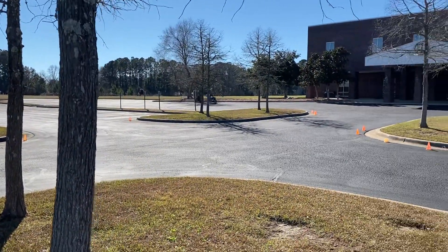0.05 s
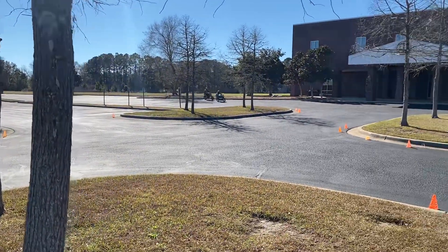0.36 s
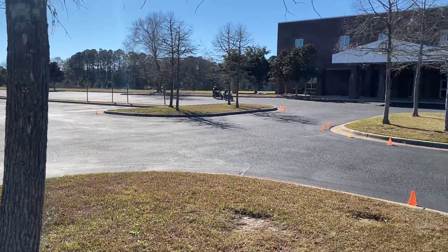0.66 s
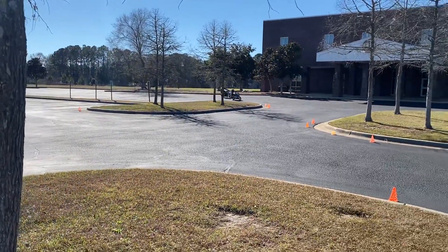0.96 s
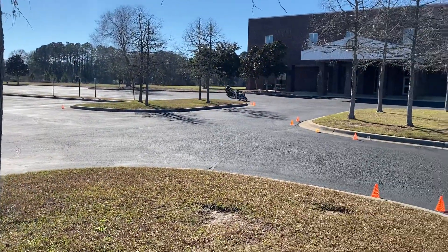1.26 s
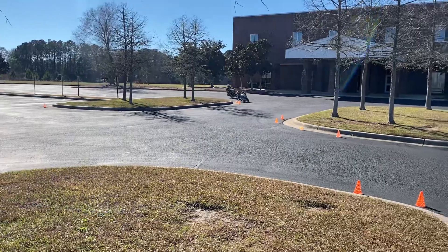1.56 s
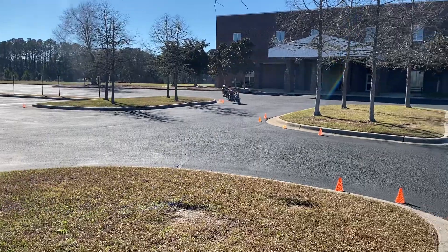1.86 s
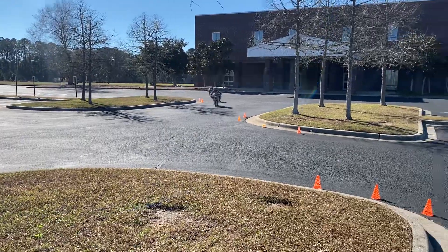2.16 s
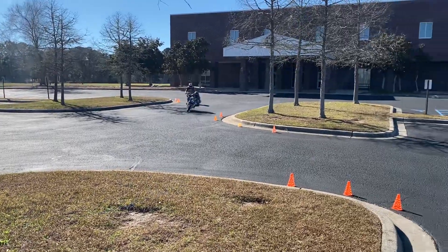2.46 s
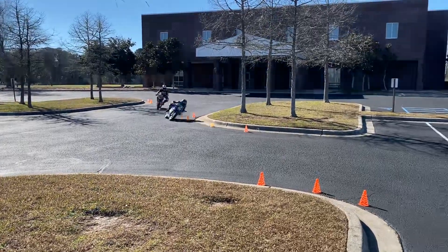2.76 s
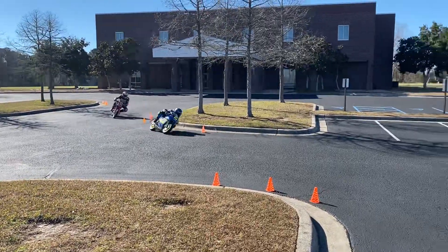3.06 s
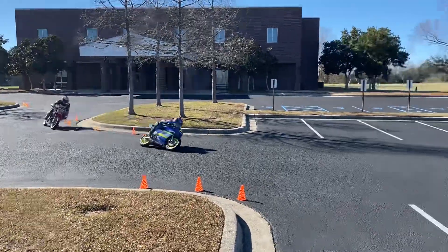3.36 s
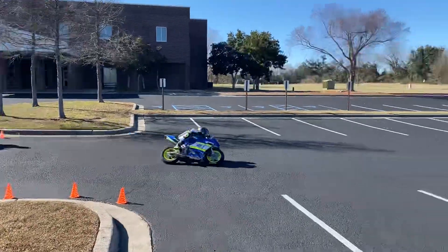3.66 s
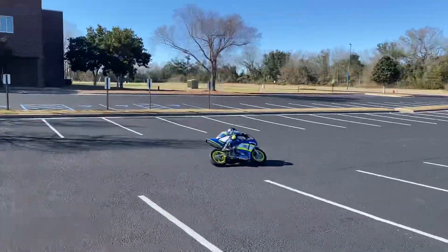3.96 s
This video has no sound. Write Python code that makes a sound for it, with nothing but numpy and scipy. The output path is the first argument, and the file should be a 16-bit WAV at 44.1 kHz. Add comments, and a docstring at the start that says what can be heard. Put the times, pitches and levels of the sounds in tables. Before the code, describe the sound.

Small motorcycle engines coast far off, then accelerate closer and pass, over light wind rumble.

```python
"""Two small single-cylinder racing motorcycles lap a paved lot in front of a building.
Far off they coast into a bend, then open their throttles and come up; the leader shifts up as it passes.
Each firing thumps the exhaust, barks under load and rings the leader's casing and silencer.
Engine clatter, tyre hiss, the building's echo and light wind on the microphone lie around them."""
import sys
import numpy as np
from scipy import signal
from scipy.fft import rfft, irfft
from scipy.io import wavfile

SR = 44100
rng = np.random.default_rng(int(sys.argv[2]) if len(sys.argv) > 2 else 0)


def bounce(signal):
    """Save signal as a 16-bit WAV file at the path given by the first command-line argument."""
    frames = np.transpose(np.atleast_2d(signal))
    limited = np.clip(frames, -1, 1)
    pcm = np.round(limited * 32767).astype(np.int16)
    wavfile.write(sys.argv[1], SR, pcm)


N = 176400
T = np.arange(N) / SR


# leader's firing rate: t/s, f/Hz
LEAD_RATE_HZ = [(0,88.6),(.19,82),(.54,76.2),(.76,64.7),(.86,61),(1.05,58.1),(1.15,59.2),(1.27,68),(1.45,78.5),(1.53,79.7),(1.83,76),
                (1.93,78.5),(1.99,82.8),(2.07,80.9),(2.26,84.6),(2.39,86.2),(2.47,85.9),(2.62,87.6),(2.9,94.7),(3.12,100.1),(3.31,102.3),
                (3.58,106.4),(3.64,105.5),(3.69,100),(3.745,97.5),(3.78,83.4),(3.85,82.9),(4,83.3)]
# leader's exhaust, far off on a light throttle: t/s, level/dB
LEAD_COAST_DB = [(0,-21),(.5,-19.5),(.7,-20.5),(.82,-27.5),(.87,-17.5),(1.05,-21),(1.2,-21.5),(1.26,-20.5),(1.36,-18.5),(1.5,-18),(1.72,-16),(1.86,-17.5),(1.93,-39),(3.6,-47),(3.7,-18),(3.76,-15),(3.82,-24)]
# leader's exhaust, driven hard or near: t/s, level/dB
LEAD_DRIVE_DB = [(0,-56),(1.2,-38.5),(1.82,-49),(1.9,-16.5),(2.3,-13.5),(2.65,-11.5),(2.95,-13.5),(3.3,-13.5),(3.63,-13.5),(3.68,-22.5),(3.76,-19.5),(3.8,-16),(4,-12.5)]
# leader's bearing: t/s, right-channel lag/ms
BEARING_MS = [(0,0.049),(2.6,0),(3.2,0.069),(3.8,0.3),(4,0.33)]
THROTTLE_S, LEAD_UNEVEN_DB = 1.872, .8

def leader():
    """First bike, swinging to the left. Returns its engine and its tyre hiss."""
    turns = crank(LEAD_RATE_HZ, drift=.0008, jitter_cycles=.002)
    turns -= np.interp(THROTTLE_S, T, turns)  # a firing lands as the throttle opens
    coast = exhaust(turns, LEAD_RATE_HZ, column=1, uneven_db=1.3)
    drive = exhaust(turns, LEAD_RATE_HZ, column=2, uneven_db=LEAD_UNEVEN_DB, boom_db=BOOM_DB)
    thump = coast * amp(curve(LEAD_COAST_DB)) + drive * amp(curve(LEAD_DRIVE_DB))
    left, right = thump + leader_bark(turns) + metal(turns)
    right = np.interp(T - curve(BEARING_MS) / 1000, T, right)
    clatter, hiss = clatter_and_tyres(turns)
    return np.array([left, right]) + clatter, hiss


# follower's firing rate: t/s, f/Hz
FOLLOW_RATE_HZ = [(0,70.96),(.3,66.14),(0.602,64.12),(1,58.95),(1.5,62.67),(1.801,59.1),(2,62.4),(2.25,59.42),(2.402,61.47),(2.551,65.68),(2.8,69.58),(2.999,74.72),(3.3,75.81),(3.6,77.45),(4,77.6)]
# follower's exhaust, far off: t/s, level/dB
FOLLOW_COAST_DB = [(0,-32.5),(.7,-24),(.9,-21.5),(1.3,-21.5),(1.55,-24),(1.9,-26),(2.3,-31.5),(2.8,-29.5),(4,-61)]
# follower under load: t/s, exhaust/dB, bark/dB
FOLLOW_LOAD_DB = [(0,-38.5,-71),(1.2,-57,-52),(1.7,-36.5,-36),(1.95,-30,-36),(2.2,-21,-28),(2.5,-20.5,-22),(2.9,-21,-28.5),(3.35,-20.5,-28),(3.7,-15.5,-27),(4,-14,-28)]

def follower():
    """Second bike, mostly at lower revs and running less evenly."""
    turns = crank(FOLLOW_RATE_HZ, drift=.0016, jitter_cycles=.004)
    coast = exhaust(turns, FOLLOW_RATE_HZ, column=3, uneven_db=1.8)
    drive = exhaust(turns, FOLLOW_RATE_HZ, column=4, uneven_db=1.8, boom_db=BOOM_DB)
    thump = coast * amp(curve(FOLLOW_COAST_DB)) + drive * amp(curve(FOLLOW_LOAD_DB))
    return thump + follower_bark(turns) * amp(curve(FOLLOW_LOAD_DB, column=2))


def crank(rate_table, drift, jitter_cycles):
    """Running count of firings; the speed drifts and each firing is slightly early or late."""
    rate_hz = curve(rate_table) * (1 + drift * wander(12))
    return np.cumsum(rate_hz) / SR + jitter_cycles * wander(40)


def firings(turns, uneven_db=1.5):
    """One click per firing, of uneven strength."""
    at = np.flatnonzero(np.diff(np.floor(turns)) > 0)
    clicks = np.zeros(N)
    clicks[at] = amp(uneven_db * rng.standard_normal(N)[at])
    return unit(clicks)


def puffs(turns, steady):
    """Gas noise that bursts at each firing and decays, over a steady share."""
    return unit((steady + np.exp(-(turns % 1))) * noise())


# exhaust harmonics: order, leader coast/dB, leader drive/dB, follower coast/dB, follower drive/dB
ORDERS_DB = [(1,-17,-0.5,-28.5,7.5),(2,-3.5,0.5,4,-6),(3,2.5,-5,-10,0),(4,-3.5,-8.5,-4.5,2),(5,-11.5,-6.5,-12.5,4.5),(6,-10.5,-6,-14.5,2.5),(7,-21,-15,-14.5,-4),(8,-25.5,-28,-27.5,-2)]
BOOM_HZ, BOOM_WIDTH_HZ, BOOM_DB = 170, 20, 4
PIPE_LAG_CYCLES, PIPE_SMEAR_RAD = .05, .22
PIPE_FADE_DB, PIPE_PHASE_RAD = 1.3, .25

def exhaust(turns, rate_table, column, uneven_db, boom_db=0):
    """Rounded pipe pulse: low harmonics swell and fade at random, louder crossing the pipe's boom."""
    t, rate_hz = T[::200], curve(rate_table)[::200]
    tone = np.zeros(N)
    for order, row in enumerate(ORDERS_DB, 1):
        swell, shift = sway(t, max_hz=4)
        phase = 2 * np.pi * order * (turns - PIPE_LAG_CYCLES) - PIPE_SMEAR_RAD * order ** 2
        phase += PIPE_PHASE_RAD * np.interp(T, t, shift)
        boost_db = boom_db * np.exp(-((order * rate_hz - BOOM_HZ) / BOOM_WIDTH_HZ) ** 2)
        gain = amp(row[column] + boost_db + PIPE_FADE_DB * swell)
        tone -= np.interp(T, t, gain) * np.sin(phase)
    return unit(tone) * amp(uneven_db * wander(33))


# leader's bark: t/s, level/dB, treble shelf edge/Hz
LEAD_BARK_DB_HZ = [(0,-50,1500),(.6,-50,1500),(.85,-56,1100),(1.2,-55,1100),(1.55,-41,1500),(1.862,-42,1500),(1.868,-25.5,2100),(2,-24.5,1900),(2.1,-26,1600),(2.27,-22,1750),(2.55,-22.5,1500),(2.75,-26.5,1350),(2.95,-24,1500),(3.08,-18.5,1650),(3.15,-17,1700),(3.18,-21.5,1350),(3.4,-26,1150),(3.6,-26,1300),(3.7,-33,1100),(4,-33,1100)]
# spectrum of its overtones: f/Hz, level/dB
OVERTONES_DB = [(550,-5),(700,-3),(800,-1.5),(950,-4),(1100,-.5),(1290,4),(1500,1.5),(1750,-1),(2000,-2),(2350,-5),(2800,-12),(4000,-20)]
BARK_SHELF_DB, BARK_FADE_DB, BARK_PHASE_RAD = 12, 3, .7

def leader_bark(turns):
    """Upper overtones line up into one pop per firing, with a gas puff; open throttle brightens them."""
    t, orders = T[::100], np.arange(8, 40)[:, None]
    hz = orders * curve(LEAD_RATE_HZ)[::100]
    edge_hz = curve(LEAD_BARK_DB_HZ, column=2)[::100]
    fades, shifts = sway(t, max_hz=2.2, shape=(len(orders),))
    cut_db = BARK_SHELF_DB / (1 + (edge_hz / hz) ** 10)
    gains = amp(spectrum(OVERTONES_DB, hz) + BARK_FADE_DB * fades - cut_db)
    gains /= np.linalg.norm(gains, axis=0)
    pops = np.zeros(N)
    for order, gain, shift in zip(orders, gains, shifts):
        phase = 2 * np.pi * order * turns + BARK_PHASE_RAD * np.interp(T, t, shift)
        pops += np.interp(T, t, gain) * np.cos(phase)
    pops = unit(pops) * amp(LEAD_UNEVEN_DB * wander(28))
    gas = colour(puffs(turns, steady=.1), BARK_SPECTRUM_DB)
    return (pops + .22 * gas) * amp(curve(LEAD_BARK_DB_HZ))


# follower's bark and both bikes' gas puffs: f/Hz, level/dB
BARK_SPECTRUM_DB = [(100,-59),(400,1.5),(600,5.5),(800,-1),(1000,5.5),(1250,2.5),(1520,2.5),(1750,-12),(2050,-3),(3000,-30.5),(5000,-31),(12000,-97)]

def follower_bark(turns):
    """The sharp front of each exhaust pulse with its puff of gas."""
    return colour(firings(turns) + .55 * puffs(turns, steady=.31), BARK_SPECTRUM_DB)


# engine casing and airbox modes: f/Hz, width/Hz, level/dB
CASING_MODES = [(390,130,2),(960,70,-2),(1245,50,-2),(2000,80,-6),(2350,170,1),(3000,120,-10),(3600,160,-5)]
# casing, heard only up close: t/s, level/dB
CASING_DB = [(0,-70),(3,-52),(3.5,-39),(3.7,-28),(3.85,-25.5),(4,-23)]
# silencer modes: f/Hz, width/Hz, level/dB
SILENCER_MODES = [(875,70,-2),(1250,50,0),(1495,35,-2),(1715,35,0)]
# silencer: t/s, level/dB
SILENCER_DB = [(0,-45),(.3,-45),(.55,-40),(.68,-43),(.85,-55),(1.25,-55),(1.58,-34.5),(1.8,-33),(2.1,-48),(2.6,-60)]

def metal(turns):
    """The leader's ringing casing and silencer."""
    casing = ringing(turns, CASING_MODES) * amp(curve(CASING_DB))
    silencer = ringing(turns, SILENCER_MODES) * amp(curve(SILENCER_DB))
    return casing + silencer


def ringing(turns, modes):
    """Firings and a little clatter excite the damped modes of a metal part."""
    t = T[:2048]
    ring = sum(amp(db) * np.sqrt(width_hz) * np.exp(-np.pi * width_hz * t) * np.sin(2 * np.pi * hz * t)
               for hz, width_hz, db in modes)
    knocks = firings(turns) + .15 * puffs(turns, steady=.1)
    return unit(signal.oaconvolve(knocks, ring[None], axes=1)[:, :N])


# leader's treble, before trim: t/s, clatter/dB, tyres/dB
TREBLE_DB = [(0,-43.5,-51.5),(.05,-48.5,-55),(.57,-46.5,-50.5),(.81,-55,-60.5),(1.29,-53,-59.5),(1.53,-45.5,-53),
             (2.15,-34.5,-48.5),(2.42,-37,-46),(2.95,-36,-42.5),(3.11,-34,-38),(3.17,-40,-41),
             (3.48,-35.5,-33.5),(3.55,-30.5,-35),(4,-32.5,-31.5)]
# engine clatter: f/Hz, level/dB
CLATTER_SPECTRUM_DB = [(200,-67.5),(900,0.5),(1800,3.5),(2350,1),(2900,-0.5),(3700,-2.5),(4700,-7.5),(5400,-10),(6500,-19),(12000,-50.5)]
# tyre hiss: f/Hz, level/dB
TYRE_SPECTRUM_DB = [(500,-13),(3000,3.5),(5400,1),(6300,-0.5),(7300,4.5),(9000,-11.5),(11000,-3),(13000,-9),(15500,-17),(17000,-52)]
CLATTER_TRIM_DB, TYRE_TRIM_DB = 3.5, .5

def clatter_and_tyres(turns):
    """Knocking engine rasp and tyre hiss, both pulsing at the firing rate."""
    clatter = colour(.15 * firings(turns) + puffs(turns, steady=.82), CLATTER_SPECTRUM_DB)
    hiss = colour(puffs(turns, steady=1), TYRE_SPECTRUM_DB)
    return (clatter * amp(curve(TREBLE_DB) + CLATTER_TRIM_DB),
            hiss * amp(curve(TREBLE_DB, column=2) + TYRE_TRIM_DB))


WALL_DELAY_S, WALL_DB = .085, -19
SCATTER_T60_S, SCATTER_DB = .4, -16

def lot(direct):
    """Adds an echo from the building and a thin scatter from trees and kerbs."""
    taps = noise()[:, :SR] * (rng.random(SR) < .05) * amp(-60 * T[:SR] / SCATTER_T60_S)
    scatter = signal.fftconvolve(direct, taps / np.linalg.norm(taps[0]), axes=1)[:, :N]
    echo = np.interp(T - WALL_DELAY_S, T, direct.mean(0), left=0)
    return direct + amp(SCATTER_DB) * scatter + amp(WALL_DB) * echo


# wind, before gusts: t/s, level/dB
WIND_DB = [(0,-42),(.6,-40),(.72,-31),(.95,-39),(1.6,-37),(1.87,-26),(2.1,-30),(2.55,-24),(3,-30),(3.45,-32),(3.7,-25),(4,-26)]
# wind rumble: f/Hz, level/dB
WIND_SPECTRUM_DB = [(15,-26),(35,-24),(50,-25),(68,-1.5),(100,-1.5),(160,-7.5),(300,-6.5),(600,-15.5),(1500,-27),(5000,-103.5)]

def wind(gust_db=2.5):
    """Light wind on the microphone: a lumpy low rumble."""
    return colour(noise(), WIND_SPECTRUM_DB) * amp(curve(WIND_DB) + gust_db * wander(13))


# likeness of left and right noise: f/Hz, correlation
STEREO_CORRELATION = [(100,0.94),(1000,0.6),(2000,1),(3800,0.73),(5500,0.14),(6800,0.82),(16000,1)]

def noise():
    """White noise, partly shared by left and right."""
    left, independent = rfft(rng.standard_normal((2, N)))
    shared = np.clip(spectrum(STEREO_CORRELATION, np.fft.rfftfreq(N, 1 / SR)), 0, 1)
    right = shared * left + np.sqrt(1 - shared ** 2) * independent
    return irfft(np.array([left, right]), N)


def wander(rate_hz):
    """Slow random motion of rms 1."""
    hz = np.fft.rfftfreq(N, 1 / SR)
    return unit(irfft(rfft(rng.standard_normal(N)) / (1 + (hz / rate_hz) ** 4), N))


def sway(t, max_hz, shape=()):
    """Two slow motions, for level and phase, each a sum of four random sines."""
    rate, start = rng.random((2, 2, 4, *shape, 1))
    return np.sin(2 * np.pi * (max_hz * rate * t + start)).sum(1) / np.sqrt(2)


def colour(x, rows):
    """Causal filter with the given spectrum; output rms 1."""
    log_gain = np.log(amp(spectrum(rows, abs(np.fft.fftfreq(8192, 1 / SR)))))
    impulse = np.fft.ifft(np.exp(np.conj(signal.hilbert(log_gain)))).real[:4096]
    return unit(signal.oaconvolve(np.atleast_2d(x), impulse[None], axes=1)[:, :N])


def spectrum(rows, hz):
    """A table read on a log-frequency axis."""
    f, value = np.transpose(rows)
    return np.interp(np.log(hz + 1), np.log(f + 1), value)


def curve(rows, column=1):
    """One column of a table over time."""
    rows = np.array(rows)
    return np.interp(T, rows[:, 0], rows[:, column])


def amp(db):
    """Decibels to gain."""
    return 10 ** (np.asarray(db) / 20)


def unit(x):
    """Scales to rms 1."""
    return x / np.sqrt(np.mean(x ** 2) + 1e-20)


def scene():
    """Both bikes on the lot, and the wind."""
    engine, hiss = leader()
    return lot(engine + follower()) + hiss + wind()


# left-right balance: f/Hz, left minus right/dB
STEREO_BALANCE_DB = [(100,0),(200,.5),(330,.3),(500,-2.5),(700,-6),(1200,-2.6),(1800,-1.5),(2600,.7),(4000,2),(5500,2.5),(7000,0),(16000,0)]
# left-right phase; two narrow treble bands are nearly opposite, widening the hiss: f/Hz, left lead/rad
STEREO_PHASE_RAD = [(60,-.15),(200,-.28),(350,-.35),(700,-.2),(1200,.4),(1800,.6),(2600,.7),(3800,.4),(7000,0),(8100,.1),(8600,3),(9400,3),(9900,.1),(12100,.1),(12700,3),(13500,3),(14100,0)]
KNEE, CEILING, CUTOFF_HZ = .75, .98, 15900

def record(dry):
    """Sets left-right level and phase by frequency, rounds off peaks, then limits the band."""
    hz = np.fft.rfftfreq(2 * N, 1 / SR)
    left_gain = amp(spectrum(STEREO_BALANCE_DB, hz) / 2) * np.exp(.5j * spectrum(STEREO_PHASE_RAD, hz))
    heard = irfft(rfft(dry, 2 * N) * np.array([left_gain, 1 / left_gain]))[:, :N]
    over, headroom = np.maximum(abs(heard) - KNEE, 0), CEILING - KNEE
    heard -= np.sign(heard) * (over - headroom * np.tanh(over / headroom))
    lowpass = signal.firwin(511, CUTOFF_HZ, window=("kaiser", 9), fs=SR)
    return signal.oaconvolve(heard, lowpass[None], "same")


dry = scene()
out = record(dry)
bounce(out)
```